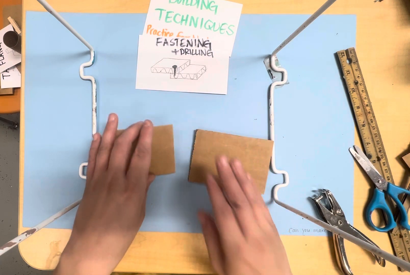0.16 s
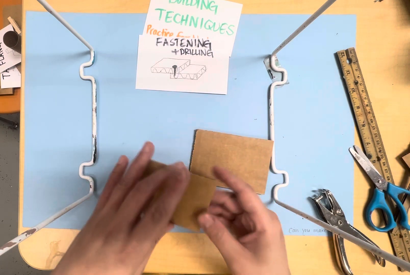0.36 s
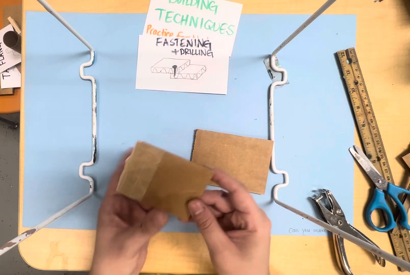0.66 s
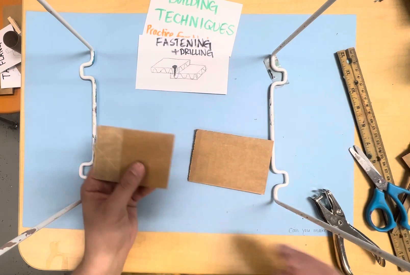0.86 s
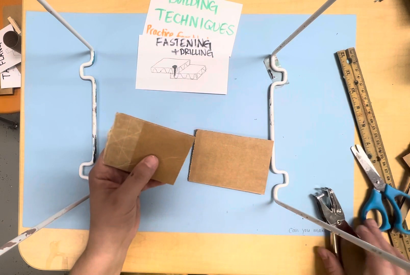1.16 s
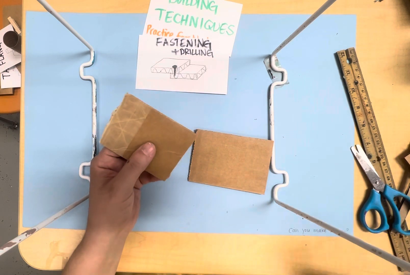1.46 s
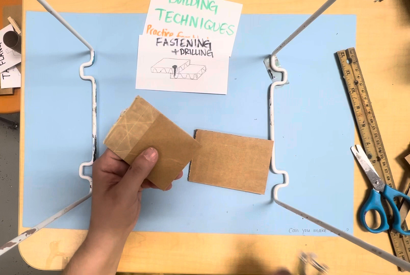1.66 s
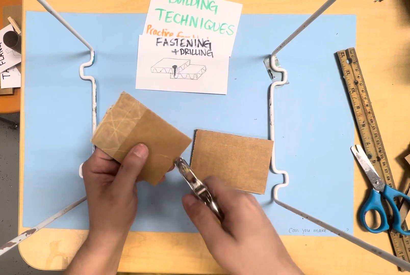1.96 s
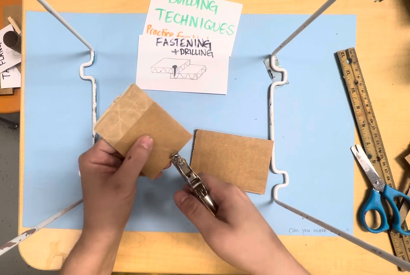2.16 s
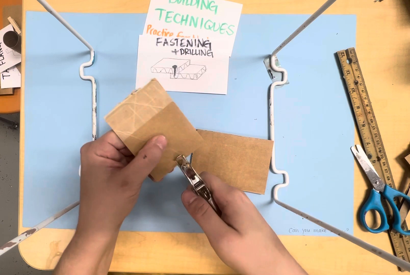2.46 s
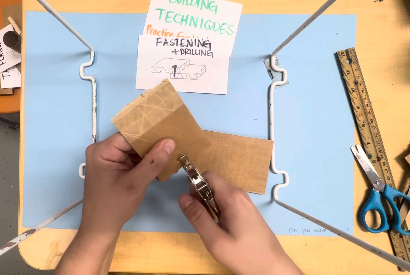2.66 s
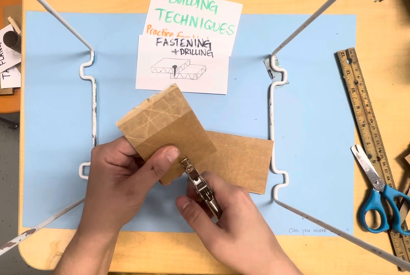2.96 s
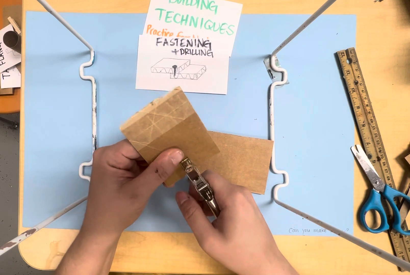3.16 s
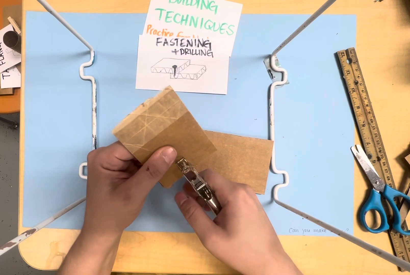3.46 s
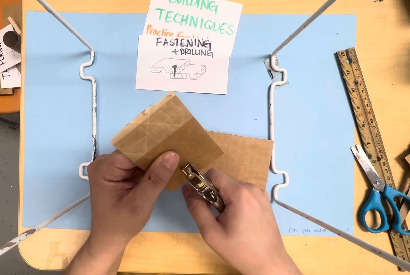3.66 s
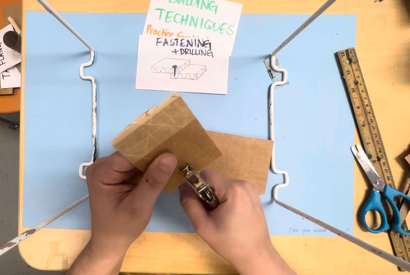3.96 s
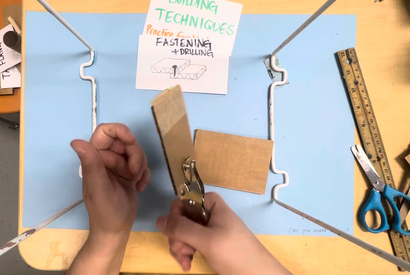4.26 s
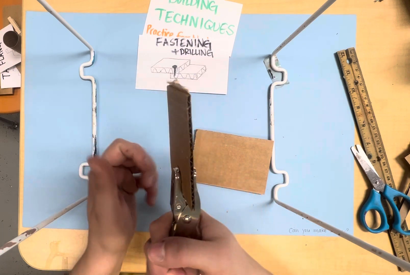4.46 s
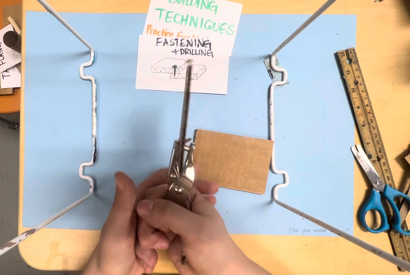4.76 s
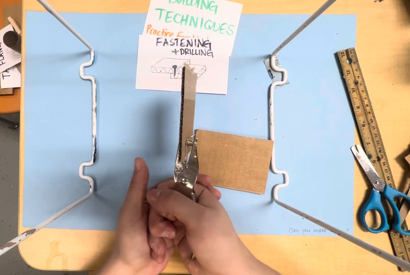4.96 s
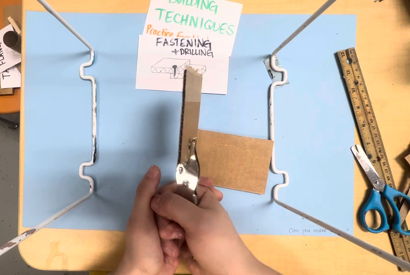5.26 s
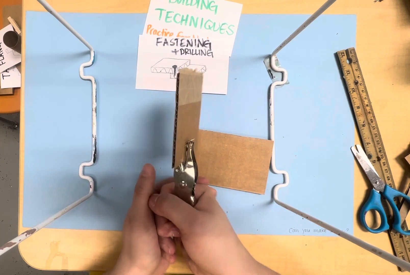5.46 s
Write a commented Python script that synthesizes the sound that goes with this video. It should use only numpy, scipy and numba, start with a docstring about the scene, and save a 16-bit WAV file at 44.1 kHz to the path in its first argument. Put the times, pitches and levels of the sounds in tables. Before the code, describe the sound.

A low, steady motor hum around 240 hertz and soft ventilation hiss with a rumble run throughout. At the very start a strong, dull slap and thud of hands and cardboard hits the work table, with smaller bumps fading by 0.25 s. Dry finger ticks and short rubs come at about 0.4, 0.7 and 0.86 s. From 1.08 to 1.25 s a cluster of hollow knocks and a drag shakes the table top. Very faint, thin spring rattles of the hand punch follow at 1.5-1.65 s. Tiny clicks, soft rubs and a barely audible squeak mark it being fitted to the board between 2.0 and 2.7 s, with sparse ticks at 3.25, 3.85 and 4.0 s. The rumble swells slightly after 4 s, with a faint bump at 4.35 s. At 5.21 s fibres crunch and the punch snaps through, loud, bright and metallic, with a brief ring and room tail. Close stereo pickup.

```python
"""A work table under a phone: hands knock and drag cardboard on the top, then a steel hole punch snaps through.
Blows ring shared table modes under noise scuffs; ticks and rubs are band-filtered grain, spring rattles are
short modes. The snap rings jaw modes over bursts of tearing noise, with wavering handle tones and a room tail.
Coloured noise is the room air; steady and wavering sines are a motor. Two ports hear each resonance with its
own balance and phase; gain control ducks loud hits."""
import sys
import numpy as np
from scipy import signal
from scipy.fft import rfft, irfft, next_fast_len
from scipy.io import wavfile
from scipy.ndimage import uniform_filter1d
from numba import njit

SR = 44100
rng = np.random.default_rng(int(sys.argv[2]) if len(sys.argv) > 2 else 0)


def bounce(signal):
    """Save signal as a 16-bit WAV file at the path given by the first command-line argument."""
    frames = np.transpose(np.atleast_2d(signal))
    limited = np.clip(frames, -1, 1)
    pcm = np.round(limited * 32767).astype(np.int16)
    wavfile.write(sys.argv[1], SR, pcm)


N = 246959
T = np.arange(N) / SR
M = next_fast_len(N)
SIDE = np.array([[.5], [-.5]])  # half of a left-minus-right difference to each port


def undb(db):
    """Amplitude factor of a level in dB."""
    return 10 ** (np.asarray(db) / 20)


def across(points, column, count):
    """A column of a (frequency [Hz], ..) table on transform bins, linear over log frequency."""
    points = np.array(points)
    bins_hz = np.fft.rfftfreq(count, 1 / SR)
    return np.interp(np.log(bins_hz + 1), np.log(points[:, 0]), points[:, column])


def ports(spectrum, count):
    """Diffuse noise at two ports: likeness, balance and phase difference depend on frequency."""
    # sound from all sides:
    # (frequency [Hz], left minus right [dB], left leads [rad], likeness [0-1])
    diffuse = [(170, 0, .5, 1), (274, 4, -0.77, 0.9), (396, -8.5, 3, 0.7), (575, -2.5, 1.5, 1),
               (933, 0, 3.5, 0.68), (1200, 3, 2.5, 0.7), (1480, -1.5, 5, 0.9), (1610, -6.5, 2.5, 0.38),
               (2140, 2.5, -0.9, 0), (3000, -2, -6, 0.06), (4400, 1.5, -5.5, 0.45), (5570, 0, -13, 1),
               (7400, 0, -12, 1), (8430, 5, -12, 1), (9640, -0.5, -11.5, 0.4)]
    both, left, right = rfft(rng.standard_normal((3, count))) * spectrum
    like = np.clip(across(diffuse, 3, count), 0, 1)
    turn = undb(across(diffuse, 1, count) / 2) * np.exp(.5j * across(diffuse, 2, count))
    pair = np.sqrt(like) * both + np.sqrt(1 - like) * np.array([left, right])
    return irfft(pair * [turn, 1 / turn], count)


def noise(colour):
    """Noise at both ports, coloured by (frequency [Hz], level [dB]) points."""
    return ports(undb(across(colour, 1, M)), M)[:, :N]


def walk(rate_hz):
    """Random levels held 1 / rate_hz and slewed twice; spread near 1."""
    hold = int(SR / rate_hz)
    steps = np.repeat(rng.standard_normal(N // hold + 1), hold)
    return 1.65 * uniform_filter1d(uniform_filter1d(steps, hold), hold)[:N]


def wavering(hz, flutter_db):
    """A tone near rms 1 whose level and phase wander independently at each port."""
    tones = []
    for _ in range(2):
        level = np.sqrt(2) * undb(flutter_db * walk(45))
        tones.append(level * np.sin(2 * np.pi * hz * T + 1.55 * walk(30)))
    return np.array(tones)


def band(x, hz, width_hz):
    """A resonance applied twice, for steep skirts."""
    b, a = signal.iirpeak(hz, hz / width_hz, SR)
    return signal.lfilter(b, a, signal.lfilter(b, a, x))


def add(out, start_s, rise_s, hz, db, t60_s, pan_db=0., lead_rad=0., phase_rad=0.):
    """Add one mode that builds up over rise_s and decays exponentially, in both ports."""
    i = int(start_s * SR)
    t = T[:min(int((rise_s + t60_s) * SR), N - i)]
    build_up = np.sin(np.pi / 2 * np.minimum(t / rise_s, 1)) ** 2
    shape = build_up * undb(db - 60 * np.maximum(t - rise_s, 0) / t60_s)
    tone = np.sin(2 * np.pi * hz * t + lead_rad * SIDE + phase_rad)
    out[:, i:i + len(t)] += shape * undb(pan_db * SIDE) * tone


def puff(start_s, rise_s, fall_s):
    """Envelope with exponential rise and fade; both times are time constants."""
    t = np.maximum(T - start_s, 0)
    return (1 - np.exp(-t / rise_s)) * np.exp(-t / fall_s)


def echoes(x, wet_db):
    """Dense room tail: noise bands, each dying at its own rate, convolved with x."""
    # bands: (frequency [Hz], level before wet_db [dB], t60 [s])
    tail_bands = [(322, -13, 0.42), (600, 8, 0.43), (852, 3.5, 0.41), (1200, 5, 0.22), (1500, -7.5, 0.45),
                  (1900, 2, 0.5), (2140, -15, 0.42), (2520, -4, 0.52), (3370, -15, 0.71), (4250, -1, 0.54),
                  (4750, -7, .5), (5170, 0.5, 0.5), (6760, -15, 0.54), (9500, -14.5, 0.52),
                  (10770, -20.5, 0.25)]
    count = 2 ** 15
    t = T[:count]
    tail = 0
    centres_hz = np.array(tail_bands)[:, 0]
    for k, (hz, db, t60_s) in enumerate(tail_bands):
        share = np.column_stack([centres_hz, np.arange(len(tail_bands)) == k])
        tail = tail + ports(np.sqrt(across(share, 1, count)), count) * undb(db - 60 * t / t60_s)
    onset = np.clip((t - .004) / 0.0078, 0, 1)
    tail = tail * onset * undb(wet_db)
    return signal.fftconvolve(x[None], tail, axes=1)[:, :N]


def air():
    """Hiss of ventilation, slowly fluttering, over a rumble that swells and flutters."""
    # air noise before swell and flutter: (frequency [Hz], density [dB per Hz])
    air_density = [(20, -95.5), (35, -78), (100, -64), (135, -65), (185, -76), (330, -76.5), (385, -83),
                   (650, -89), (930, -93), (1900, -92), (2700, -93.5), (3700, -99.5), (4400, -100.5),
                   (5050, -108), (6300, -101), (8000, -104), (9000, -113), (10700, -116), (11600, -128)]
    # gain of the rumble: (time [s], level [dB])
    rumble_swell = [(0, -0.7), (1.6, 0.5), (3.0, 0), (3.9, 0.5), (4.1, 5.5), (4.45, 4.5), (4.8, 2),
                    (5.6, 2.5)]
    colour = undb(across(air_density, 1, M)) * np.sqrt(SR / 2)
    low = across([(150, 0.99), (260, 0.1)], 1, M)  # power share of the rumble
    rumble_db = np.interp(T, *np.transpose(rumble_swell)) + 0.23 * walk(9.6)
    rumble = ports(colour * np.sqrt(low), M)[:, :N]
    hiss = ports(colour * np.sqrt(1 - low), M)[:, :N]
    return rumble * undb(rumble_db) + hiss * undb(0.23 * walk(1.8))


def motor():
    """Mains overtones with wavering side tones from the turning shaft."""
    # tones: (frequency [Hz], rms before wavering and balance [dB], wavering [dB],
    # left minus right [dB], left leads [rad])
    hum = [(213, -51, 2, -6.5, -4), (240, -41.5, 0, -5, -1.32), (269.8, -58, 3, -8, 0.4),
           (360.4, -65, 0.5, -5.5, 2.5), (479.5, -56.5, 1.5, -6.5, 1.78), (508.4, -66, 1.5, -1, 4)]
    out = 0
    for hz, db, waver_db, pan_db, lead_rad in hum:
        phase = 2 * np.pi * hz * T + rng.uniform(0, 2 * np.pi) + 0.5 * waver_db * walk(6.3)
        level = np.sqrt(2) * undb(db + waver_db * walk(7) + pan_db * SIDE)
        out = out + level * np.sin(phase + lead_rad * SIDE)
    return out


def hands():
    """Skin and jaws on cardboard excite broad noise bands; loose spring parts ring; jaws squeak on the board."""
    # fingers and jaws on cardboard:
    # (time [s], initial rms before balance [dB], frequency [Hz], left minus right [dB])
    ticks = [(0.382, -38.5, 4250, -4), (0.381, -37, 1350, 9), (0.399, -37, 1720, 8), (.397, -40, 1010, 14),
             (0.6983, -39.5, 1410, -5), (.697, -44.5, 3100, 7), (.709, -36, 1150, 9.5),
             (0.8627, -41.5, 2520, 5.5), (1.965, -51.5, 1060, 2), (2.275, -51, 1050, -2),
             (2.408, -53, 3400, -6), (2.407, -43, 1030, 3), (2.424, -46, 1000, 1), (2.466, -46, 990, -1),
             (2.6222, -46.5, 990, -1), (2.722, -55, 4500, -5), (3.249, -52, 2400, 0), (3.839, -45, 1300, 5),
             (4.017, -43.5, 1000, 1), (4.032, -46, 2570, 5)]
    # skin on cardboard: (start [s], length [s], level [dB], centre [Hz], filter width [Hz])
    rubs = [(.003, 0.009, -40.5, 4760, 5960), (0.365, 0.044, -53.5, 3570, 5050),
            (0.372, 0.027, -45, 1500, 1010), (0.71, 0.054, -54.5, 2800, 4000),
            (0.723, 0.037, -48.5, 1600, 1200), (1.507, 0.12, -62, 5900, 5960),
            (2.141, 0.059, -59, 2570, 600), (2.388, 0.13, -63.5, 3000, 2500),
            (3.97, 0.077, -59, 3480, 4970), (3.993, 0.14, -56, 1020, 600), (4.028, 0.09, -59.5, 3000, 300)]
    # spring and pin: (frequency before detune [Hz], relative level [dB], t60 [s])
    spring = [(4600, -7, 0.048), (5040, -3.5, 0.08), (6020, -9, 0.05), (7030, 1, 0.045), (8640, -8, .03),
              (9700, -8, .025)]
    # loose parts meeting: (time [s], level [dB])
    rattles = [(1.478, -59.5), (1.530, -57.5), (1.544, -55), (1.564, -62), (1.593, -65), (1.655, -60)]
    tick_rise_s, tick_t60_s = 0.00052, 0.024
    squeak_s, squeak_length_s, squeak_db, squeak_hz = 2.11, 0.079, -61, 1150
    small_wet_db = -45.5

    out = np.zeros((2, N))
    grain = ports(0.91, M)[:, :N]
    for start_s, db, hz, pan_db in ticks:
        i, count = int(start_s * SR), int(.1 * SR)
        burst = band(grain[:, i:i + count], hz, 0.47 * hz)
        burst = burst / np.std(burst[:, :count // 20])
        rise = np.minimum(T[:count] / tick_rise_s, 1)
        fade = rise * undb(db - 60 * T[:count] / tick_t60_s)
        out[:, i:i + count] += burst * fade * undb(pan_db * SIDE)
    for start_s, db in rattles:
        for hz, mode_db, t60_s in spring:
            # the loose parts meet differently every time
            detune, size = rng.standard_normal(2)
            add(out, start_s, .0003, hz * (1 + .04 * detune), db + mode_db + 3 * size, t60_s)
    grain = grain * undb(1.8 * walk(300))
    for start_s, length_s, db, hz, width_hz in rubs:
        i, count = int(start_s * SR), int(length_s * SR)
        # the factor offsets the power lost in a narrow band
        rub = band(grain[:, i:i + count], hz, width_hz) * np.sqrt(2 * SR / np.pi / width_hz)
        out[:, i:i + count] += undb(db) * np.hanning(count) ** 0.33 * rub
    i, count = int(squeak_s * SR), int(squeak_length_s * SR)
    squeak = wavering(squeak_hz, 1)[0, :count]
    out[:, i:i + count] += undb(squeak_db) * np.sqrt(np.hanning(count)) * squeak
    return out + echoes(out[0] - .5 * out[1], small_wet_db)


def table():
    """Each contact feeds the table modes by its own shares, with a noise scuff of cardboard on top."""
    # modes: (part [0-7], frequency [Hz], relative level [dB], t60 [s],
    # left minus right [dB], left leads [rad])
    table_modes = [(0, 48, -12.5, 0.5, -1.5, .2), (0, 97.64, -8, 0.95, -8.5, 0.91),
                   (0, 118, 1, 0.074, -13.5, 0.3), (1, 170, -2, 0.27, -9.5, 3.06),
                   (1, 212.2, -2, 0.13, 4.5, 1.6), (2, 336, 4, 0.11, 7.5, 3.08),
                   (3, 366, 3, 0.14, -1, 2.47), (4, 476.3, 0.5, 0.098, -3, 2.78),
                   (4, 498, 2, 0.11, -7, 2.8), (5, 551.5, 1.5, 0.13, 0.5, 2.64),
                   (6, 620, 1.5, 0.062, -4, 2.04), (6, 701, 0, 0.28, 3, 2.9), (7, 842, 4.5, 0.073, 8, 3.46),
                   (7, 958, -18, 0.61, 4.5, 3.7), (7, 1030, 0.5, 0.084, -3.5, 4.46),
                   (7, 1087, -12.5, 0.28, 4, 4.6), (7, 1165, -16.5, 0.14, 12, 1.8),
                   (7, 1302, -6.5, 0.029, 1, 5), (7, 1800, -20, 0.23, 11.5, 4.1)]
    # blows: (time [s], contact kind, build-up [ms], push level [dB],
    # tilt [dB per part], scuff level [dB])
    blows = [(.014, "slap", 7.7, -12.5, 0.1, -22), (0.036, "thud", 15.6, -17, 1, -47),
             (0.057, "edge", 8.9, -23.5, -2, -41), (.083, "thud", 8.2, -36, 3, -58),
             (0.103, "slap", 12, -33.5, -4.5, -61.5), (.130, "thud", 15, -36, 2.5, -61),
             (.222, "thud", 14, -36.5, 0, -67), (1.079, "thud", 9.2, -40, -4.5, -59),
             (1.096, "knock", 9.3, -42, 0.5, -56), (1.111, "drag", 14.3, -21, 1, -37),
             (1.120, "drag", 33.3, -13, 1, -36), (1.185, "rap", 12.7, -23.5, 0.5, -41.5),
             (1.205, "knock", 6.9, -23.5, 0.5, -42), (1.244, "tap", 13.3, -27, -0.5, -52),
             (1.365, "tap", 20, -52, 0, -72), (4.351, "edge", 22, -44, -2, -60)]
    # push of each contact kind into parts 0-7: kind: (relative level [dB], ..)
    contacts = {"slap": (-33, -10.5, -6, 7.5, 5, -17, -20, -3),
                "thud": (0.5, -13, -8, -19, -19.5, -27, -32, -39),
                "edge": (-42, -9, -34, -6, 9.5, -3, -20, -13.5),
                "drag": (-16.5, -26, 0.5, -34, -33, -8.5, -31, -27),
                "knock": (2.5, 0, -5.5, -11, -0.5, -12.5, -14.5, -10),
                "rap": (-7, 2.5, -2, -16, 2, -13, 0.5, -9), "tap": (-2.5, 6, -14, -10, -9, -18, -2, -15.5)}
    scuff_fade_ms, fade_per_build_up = 1.7, 1.78
    hiss_under_db, hiss_fade_share = -13.5, 0.65
    table_wet_db = -56

    out, scuff, hiss = np.zeros((2, N)), 0, 0
    for start_s, kind, rise_ms, push_db, tilt_db, scuff_db in blows:
        part_db = push_db + np.array(contacts[kind]) + tilt_db * np.arange(-2, 6)
        for part, hz, db, t60_s, pan_db, lead_rad in table_modes:
            # a new blow falls in step with the ringing that is left
            phase_rad = 2 * np.pi * hz * start_s
            add(out, start_s, rise_ms / 1000, hz, db + part_db[part], t60_s, pan_db, lead_rad, phase_rad)
        # slower build-up, slower fade
        fade_s = (scuff_fade_ms + fade_per_build_up * rise_ms) / 1000
        scuff = scuff + undb(scuff_db) * puff(start_s - .002, 0.0029, fade_s)
        hiss_puff = puff(start_s - .004, 0.0028, hiss_fade_share * fade_s)
        hiss = hiss + undb(scuff_db + hiss_under_db) * hiss_puff
    out = out * undb(1.0 * walk(120))  # the contact chatters
    out = out + scuff * noise([(400, 12.0), (1200, 20.0), (1900, 7.5), (3100, 1.0), (3400, -30)])
    out = out + hiss * noise([(2500, -25), (4000, 9.0), (6000, -0.5), (9500, 1), (10600, -27)])
    return out + echoes(out[0] - .5 * out[1], table_wet_db)


def punch():
    """Every jolt rings the jaws, a little differently, over the crunch of tearing fibres."""
    # jaws and board: (frequency [Hz], relative level [dB], t60 [s],
    # left minus right [dB], left leads [rad])
    jaws = [(435, -33, 0.02, 0, -1), (600, -16.5, 0.016, 3, -3), (1137, -8, 0.015, 4.5, 1.5),
            (1600, -15.5, 0.015, 13.5, 5), (1920, -2, 0.011, -1, 3.5), (2500, -2.5, 0.022, 3, 3.5),
            (3000, -10, 0.029, -2, 4), (3690, -7, 0.0127, -6.5, 4), (4270, -6, 0.0074, -1, 0),
            (5105, -12.5, 0.026, 1, 2), (5900, -20, 0.013, 13, 0.5), (6300, -12, 0.015, -7, 4.5),
            (8140, -4, 0.015, 6.5, -2), (8760, -16, 0.011, 8.5, -0.5), (9400, -9, 0.0069, -5, 1)]
    # the pin shears the fibres, breaks through, hits the stop, the board jumps and the table
    # sends it back: (time [s], level [dB], tilt about 2500 Hz [dB per octave])
    snaps = [(5.212, -28, -6), (5.2140, -19.5, -1.5), (5.218, -22.5, -1.5), (5.2206, -11.5, 2),
             (5.2224, -7.5, -0.5), (5.2253, -19.5, -4), (5.235, -21.5, -5.5)]
    # fibres shearing, then breaking:
    # (time [s], level [dB], rise time constant [s], fade time constant [s])
    crunch_puffs = [(5.207, -22, 0.0064, 0.0084), (5.22, -6.5, 0.00056, 0.0032)]
    # steel handles ring on, blurred by the grip:
    # (frequency [Hz], level before flutter and fade [dB])
    handles = [(1950, -41.5), (2568, -43), (3117, -49), (3800, -44), (4200, -52), (5141, -37.5),
               (5800, -47), (6250, -42)]
    handles_s, handles_rise_s, handles_fade_s, handles_flutter_db = 5.224, 0.0049, 0.068, 3
    snap_wet_db = -15

    out, crack = np.zeros((2, N)), np.zeros(N)
    loudest_s, loudest_db, _ = max(snaps, key=lambda row: row[1])
    crack[int(loudest_s * SR)] = undb(loudest_db)
    all_sizes = rng.standard_normal((len(snaps), len(jaws)))
    for (start_s, db, tilt_db), sizes in zip(snaps, all_sizes):
        for k, ((hz, mode_db, t60_s, pan_db, lead_rad), size) in enumerate(zip(jaws, sizes)):
            level_db = db + mode_db + tilt_db * np.log2(hz / 2500) + 2.3 * size
            # neighbouring modes start in opposite directions
            add(out, start_s, .0008, hz, level_db, t60_s, pan_db, lead_rad, np.pi * k)
    # the room answers the loudest jolt and the ring of the jaws
    room = echoes(crack + undb(-34) * (out[0] - out[1]), snap_wet_db)
    fibres = noise([(1000, -1.5), (2500, 3.0), (9000, -11.0), (10500, -24), (14000, -36)])
    tearing = sum(undb(db) * puff(start_s, rise_s, fade_s) for start_s, db, rise_s, fade_s in crunch_puffs)
    ring = sum(undb(db) * wavering(hz, handles_flutter_db) for hz, db in handles)
    ring = ring * puff(handles_s, handles_rise_s, handles_fade_s)
    return out + room + ring + fibres * tearing


def scene():
    """Sum of air, motor, hands, table and punch at the two ports."""
    return air() + motor() + hands() + table() + punch()


@njit
def duck(x, top, attack, release, power):
    """Gain that falls when the followed level passes top; attack and release are shares per sample."""
    gain, followed = np.empty(len(x)), 0.
    for i in range(len(x)):
        followed += (x[i] - followed) * (attack if x[i] > followed else release)
        gain[i] = (top / max(followed, top)) ** power
    return gain


def record(dry):
    """Gain control turns loud hits down a little, peaks are rounded and the top is cut."""
    top_hz, release_s = 11200, .25
    gain = duck(np.abs(dry).max(axis=0), 0.012, 0.00061, 1 / (release_s * SR), 0.068)
    loud = dry * gain
    rounded = loud / (1 + loud ** 6) ** (1 / 6)
    lowpass = signal.ellip(6, .2, 40, top_hz, fs=SR, output="sos")
    return .95 * signal.sosfilt(lowpass, rounded)


dry = scene()
out = record(dry)
bounce(out)
```